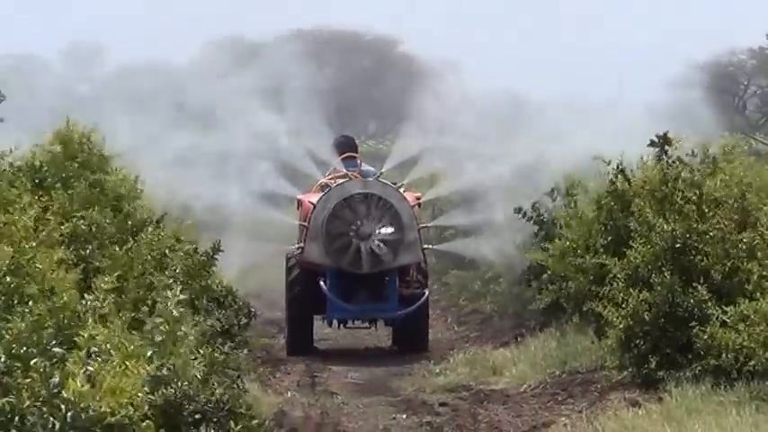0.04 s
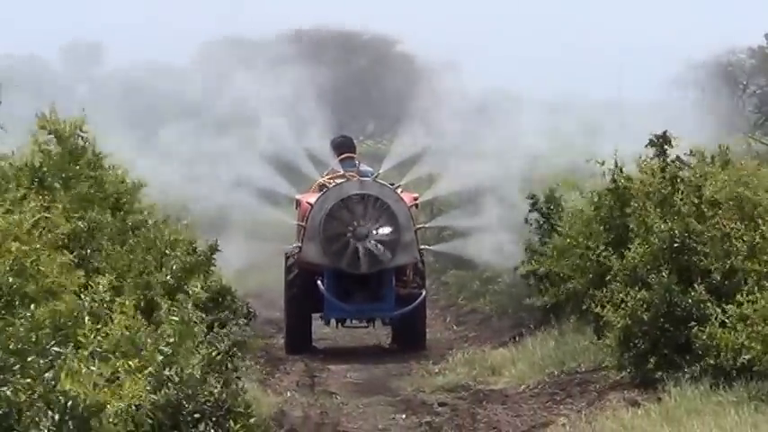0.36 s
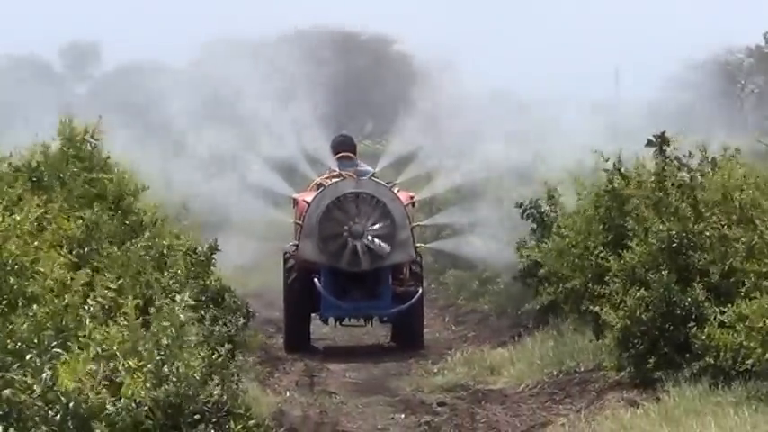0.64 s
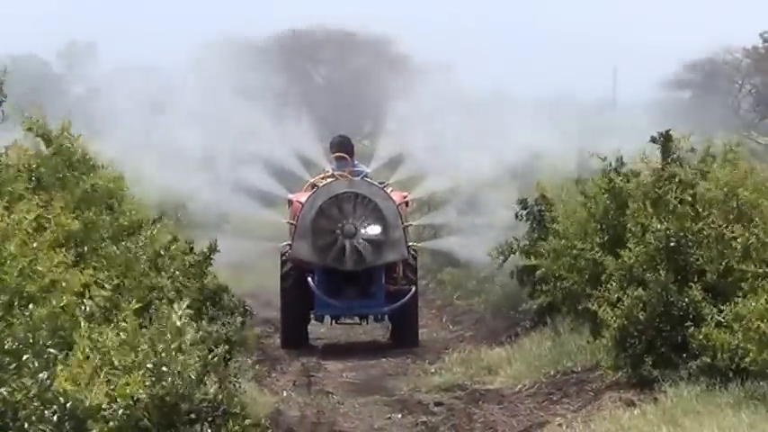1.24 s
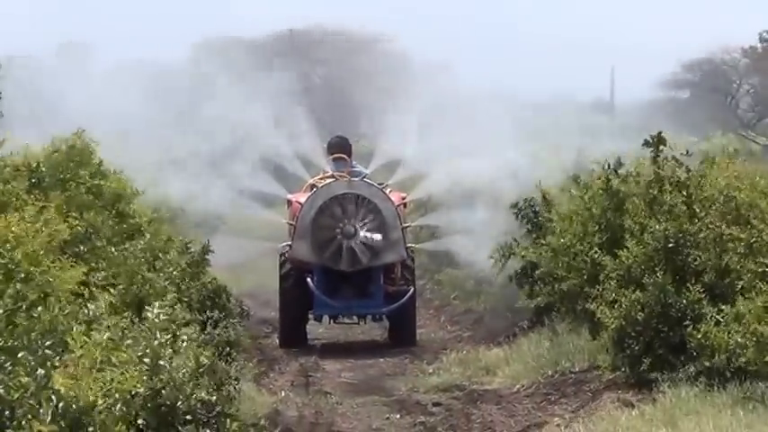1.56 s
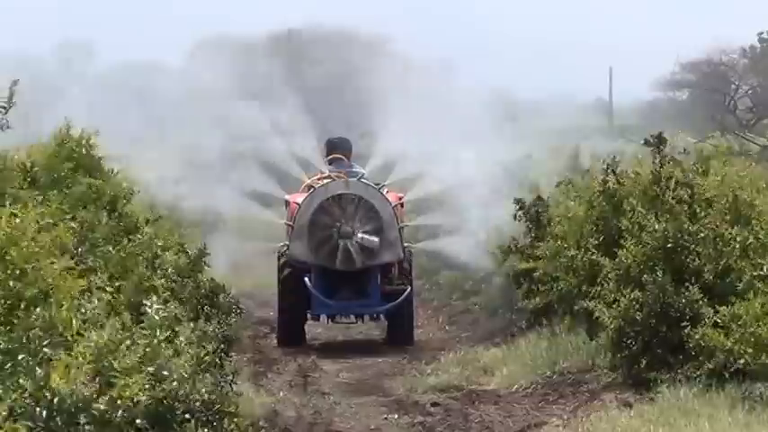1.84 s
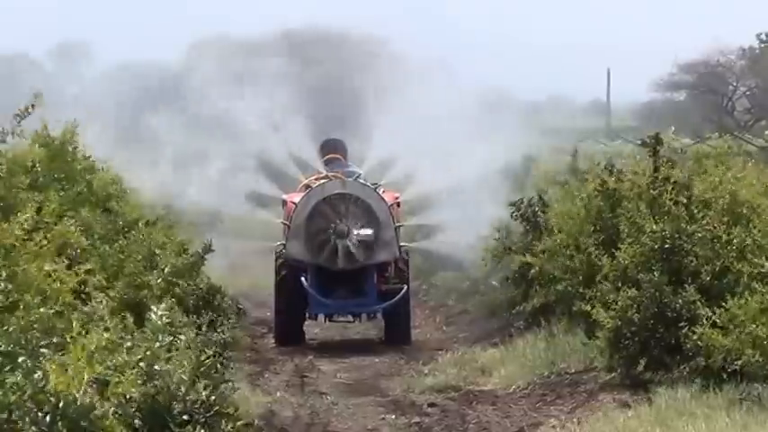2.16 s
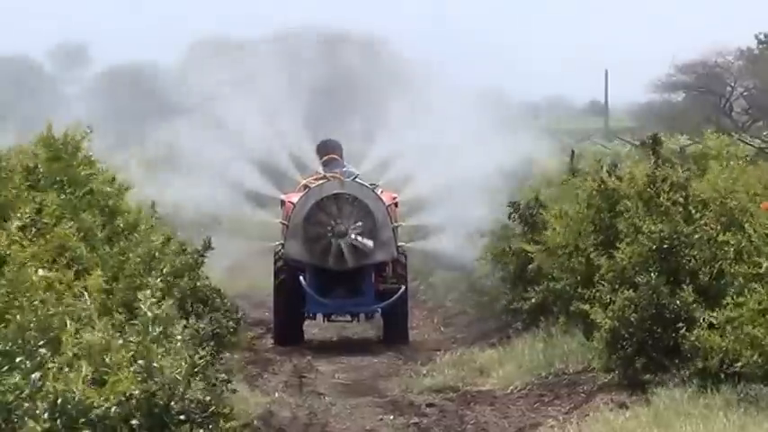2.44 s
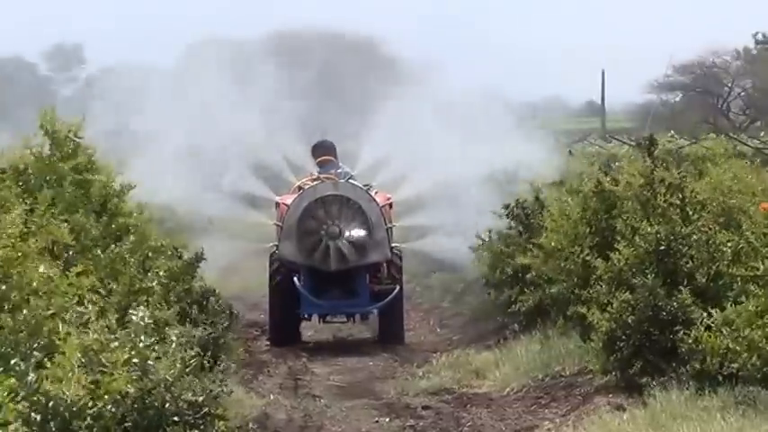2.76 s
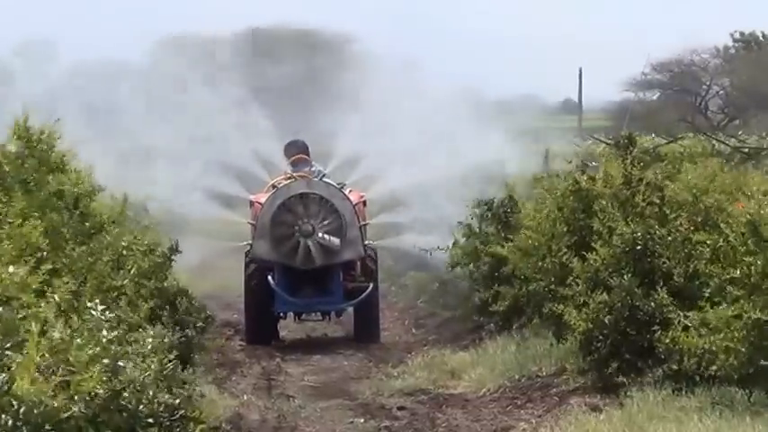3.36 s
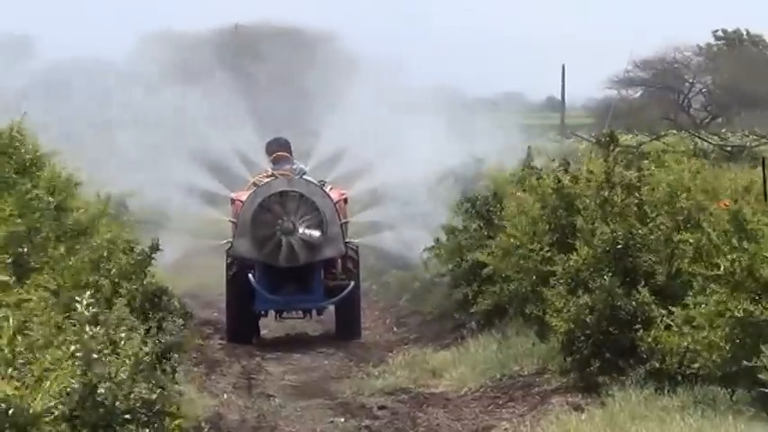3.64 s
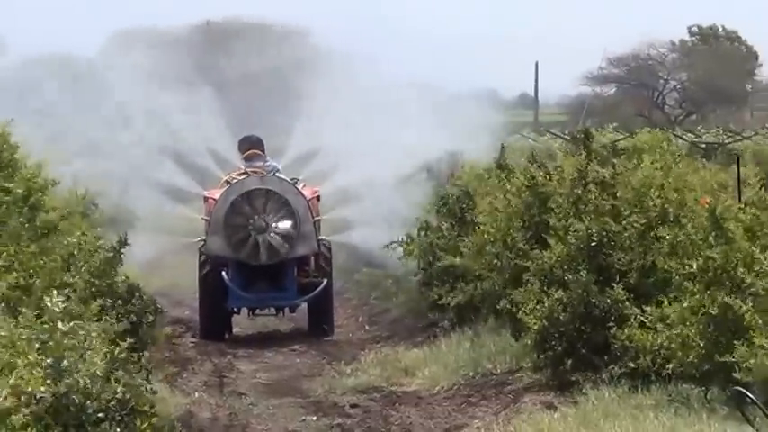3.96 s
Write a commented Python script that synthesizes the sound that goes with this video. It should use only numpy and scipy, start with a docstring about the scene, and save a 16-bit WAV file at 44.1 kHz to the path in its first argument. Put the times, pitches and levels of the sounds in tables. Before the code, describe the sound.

An orchard sprayer's fan roars and its nozzles hiss, with wind buffeting the microphone.

```python
"""Wind buffets the microphone over the roar and hiss of an orchard sprayer behind a tractor.
Turbulent air excites the resonances of the fan housing, giving a swelling roar with a faint whine.
The nozzle jets hiss in surges, and a dull engine drone lies beneath them.
The hardest puffs of wind drive a limiter, which ducks the whole sound."""
import sys
import numpy as np
from scipy import signal
from scipy.io import wavfile
from scipy.ndimage import uniform_filter1d

SR = 44100
rng = np.random.default_rng(int(sys.argv[2]) if len(sys.argv) > 2 else 0)


def wrap_up_sound(samples):
    """Save the sound to the file named by the first command line argument, as 16-bit audio."""
    columns = np.atleast_2d(samples).T
    # keep every value between -1 and 1, then stretch to whole-number steps
    tamed = np.clip(columns, -1, 1)
    steps = np.round(tamed * 32767).astype(np.int16)
    wavfile.write(sys.argv[1], SR, steps)


N = 176400

# spectrum of the engine drone and far rush of air: frequency_hz, relative_density_db
DRONE_SPECTRUM = [(30, -5.5), (90, -8), (200, -15), (400, -22.5), (650, -9), (1000, -14), (2000, -33)]
# faint narrow bands of noise, opposite in left and right, that widen the sound:
# centre_hz, bandwidth_hz, relative_level_db
WIDENING_BANDS = [(1390, 270, -29.5), (2450, 180, -35), (3130, 180, -38), (3720, 180, -39),
                  (4420, 240, -28.5)]

# steady push of the wind: time_s, relative_level_db
BREEZE_ENVELOPE = [(0, -29), (.35, -30), (.65, -30.5), (.92, -34.5), (1.25, -29.5), (1.38, -33),
                   (1.72, -28), (2.0, -30), (2.2, -37), (2.33, -30), (2.55, -37.5), (2.85, -30),
                   (3.15, -31.5), (3.4, -28), (3.53, -38), (3.65, -39), (3.75, -31.5), (4, -32.5)]
# puffs of wind: centre_s, half_power_width_s, relative_rumble_db, relative_flapping_db
WIND_PUFFS = [(0.056, 0.0073, -16.5, -25), (0.149, 0.014, -21, -24), (0.202, 0.0075, -17, -31),
              (0.276, 0.016, -17, -20.5), (0.554, 0.0096, -12, -15.5), (0.587, 0.039, -17.5, -26.5),
              (0.754, .014, -16.5, -25.5), (0.791, 0.013, -22, -26.5), (1.175, 0.011, -23, -20),
              (1.215, 0.011, -20.5, -17), (1.247, 0.016, -13.5, -20.5), (1.285, 0.018, -20, -26),
              (1.516, .022, -20, -26), (1.574, .018, -22, -30), (1.618, 0.016, -5, -14),
              (1.657, 0.023, -8, -9.5), (1.681, 0.016, -9, -19), (1.716, 0.02, -11, -15.5),
              (1.755, 0.03, -17.5, -21), (1.781, 0.035, -16.5, -17), (1.873, 0.0095, -27.5, -15),
              (1.946, 0.004, -13.5, -25), (2.141, 0.0086, -26, -29), (2.252, 0.026, -22, -19.5),
              (2.36, 0.014, -25, -27), (2.675, 0.022, -23.5, -29.5), (2.789, .018, -20, -38),
              (2.848, 0.037, -25, -29.5), (3.054, 0.018, -24, -26.5), (3.188, 0.016, -16.5, -18.5),
              (3.304, 0.02, -12.5, -24), (3.332, 0.057, -20, -20.5), (3.373, 0.01, -19, -32),
              (3.431, 0.019, -19, -19), (3.723, 0.039, -26.5, -43), (3.995, .022, -22, -39)]
# spectrum of the wind's low rumble: frequency_hz, relative_density_db
RUMBLE_SPECTRUM = [(20, -4), (35, -5.5), (70, 2.5), (120, 3), (190, -7), (300, -14), (600, -54.5)]
# spectrum of the wind's rougher flapping: frequency_hz, relative_density_db
FLAPPING_SPECTRUM = [(100, -4.5), (200, 3.5), (320, -1), (480, -7), (750, -15), (1300, -30), (2500, -40)]

# spectrum of the nozzle hiss: frequency_hz, relative_density_db
HISS_SPECTRUM = [(3500, -1), (4600, -2.5), (5400, 1), (7200, 1.5), (8500, -1.5), (11000, -12.5),
                 (16000, -17)]
# swell of the nozzle hiss: time_s, level_db
HISS_ENVELOPE = [(0, -45), (.11, -32.5), (.25, -37.5), (.6, -39.5), (.8, -37.5), (1.1, -36.5),
                 (1.28, -28.5), (1.45, -31.5), (1.6, -28), (1.85, -31), (2.15, -28), (2.28, -27),
                 (2.52, -24.5), (2.95, -28), (3.38, -27.5), (3.5, -26.5), (3.82, -32.5), (4, -30.5)]
# spectrum of the mist's sizzle: frequency_hz, relative_density_db
SIZZLE_SPECTRUM = [(6800, -9.5), (7800, -0.5), (8600, 4), (10000, 3), (11200, 2.5), (12300, -3.5),
                   (13500, -8), (16000, -13)]
# surges of the sizzle: time_s, level_db
SIZZLE_ENVELOPE = [(0, -40), (.12, -28), (.23, -38), (.33, -33), (.52, -41.5), (.71, -36), (.91, -37),
                   (.99, -33), (1.1, -34.5), (1.28, -28.5), (1.46, -31), (1.6, -28.5), (1.99, -29.5),
                   (2.07, -26), (2.28, -28.5), (2.42, -24.5), (2.57, -23), (2.76, -27), (2.88, -27),
                   (2.96, -28), (3.25, -26.5), (3.36, -29), (3.49, -26.5), (3.68, -26.5), (3.8, -30.5),
                   (3.91, -26.5), (4, -29.5)]
# airy top of the treble: time_s, level_db
AIR_ENVELOPE = [(0, -48), (.12, -43), (.53, -49), (.71, -45), (1.05, -50), (1.3, -42), (1.48, -46),
                (1.58, -43), (2.28, -47), (2.48, -35), (2.62, -37), (2.9, -52), (3.6, -47), (3.82, -46),
                (4, -41)]
# stereo width of the hiss and sizzle: frequency_hz, side_to_mid_db
HISS_WIDTH = [(4000, -48), (5500, -28), (7600, -9), (10000, -22.5), (15000, -46.5)]

# lower resonances of the fan housing: centre_hz, bandwidth_hz, relative_level_db
LOWER_MODES = [(1378, 203, -3.5), (1175, 166, -10), (1580, 95, -13.5)]
# swell of the lower roar: time_s, gain_db
LOWER_ENVELOPE = [(0, -45.5), (.35, -45.5), (.7, -35.5), (1.5, -35.5), (2.05, -34), (2.75, -30.5),
                  (3.3, -32), (4, -37)]
# upper resonances of the fan housing: centre_hz, bandwidth_hz, relative_level_db
UPPER_MODES = [(2023, 390, -11.5), (2903, 444, -9.5), (3335, 380, -12), (4053, 330, -13), (4500, 270, -18),
               (3340, 3160, -9.5)]
# swell of the upper roar, the whines and the widening noise: time_s, gain_db
UPPER_ENVELOPE = [(0, -35), (.12, -32.5), (.45, -32), (.68, -35.5), (.82, -32.5), (1.15, -30.5),
                  (1.45, -24.5), (1.6, -24), (2.0, -28.5), (2.25, -26), (2.38, -24.5), (2.7, -21.5),
                  (3.0, -22), (3.55, -23), (3.8, -26.5), (4, -25.5)]
# thin whines of the fan: pitch_hz, bandwidth_hz, relative_level_db
FAN_WHINES = [(2850, 25, -17.5), (4066, 33, -26), (4405, 37, -20)]

ANTIPHASE = np.array([[1], [-1]])   # opposite signs in the left and right channels


def from_db(db):
    """Amplitude grows tenfold for every 20 dB."""
    return 10 ** (np.asarray(db) / 20)


def unit_rms(x):
    """Dividing by the root mean square gives a signal unit power."""
    return x / np.sqrt(np.mean(x ** 2) + 1e-20)


def envelope(rows):
    """Straight lines in decibels give a gain that grows or decays exponentially between rows."""
    return from_db(np.interp(np.arange(N) / SR, *np.transpose(rows)))


def at_hz(curve, hz):
    """Hearing follows frequency ratios, so a curve is interpolated on a logarithmic axis."""
    frequencies, values = np.transpose(curve)
    return np.interp(np.log(hz), np.log(frequencies), values)


def drift(rate_hz):
    """Noise smoothed by two low-pass poles wanders slowly, with unit rms."""
    step, settling = 40, 2000   # audio samples a step; steps for the filter to settle
    pole = np.exp(-2 * np.pi * rate_hz * step / SR)
    noise = rng.standard_normal(N // step + settling + 2)
    slow = signal.lfilter([1], [1, -2 * pole, pole * pole], noise)[settling:]
    return np.interp(np.arange(N) / step, np.arange(len(slow)), unit_rms(slow))


def band_noise(low_hz, high_hz, side_db):
    """An independent side signal decorrelates the channels and widens a band of noise."""
    band_pass = signal.butter(2, [low_hz, high_hz], "band", fs=SR, output="sos")
    mid, side = signal.sosfilt(band_pass, rng.standard_normal((2, N + SR // 10)))[:, -N:]
    return unit_rms(mid + from_db(side_db) * side * ANTIPHASE)


def bands(spectrum, count):
    """Band power is density times bandwidth; each band is low_hz, high_hz, centre_hz, gain."""
    edges = np.geomspace(spectrum[0][0], spectrum[-1][0], count + 1)
    centres = np.sqrt(edges[:-1] * edges[1:])
    gains = from_db(at_hz(spectrum, centres)) * np.sqrt(np.diff(edges))
    return zip(edges[:-1], edges[1:], centres, gains)


def coloured_noise(spectrum, side_db):
    """Independent bands add in power to form the given spectral shape, at unit rms."""
    parts = (gain * band_noise(low, high, side_db) for low, high, _, gain in bands(spectrum, count=12))
    return unit_rms(sum(parts))


def short_term_power(x, window_s):
    """Power is the mean square pressure, here over both channels and a sliding window."""
    return uniform_filter1d(np.mean(x ** 2, axis=0), int(window_s * SR)) + 1e-9


def steadied(noise):
    """Dividing noise by its short-term rms evens out its chance swells."""
    return noise / np.sqrt(short_term_power(noise, window_s=.022))


def resonance(hz, bandwidth_hz, level_db):
    """A resonance driven by noise passes one band of it, here with a fluttering level."""
    flutter_db = .9 * drift(rate_hz=11.6)
    noise = band_noise(hz - bandwidth_hz / 2, hz + bandwidth_hz / 2, side_db=-25)
    return from_db(level_db + flutter_db) * noise


def resonances(rows):
    """Independent bands of noise superpose, each with a flutter of its own."""
    return sum(resonance(*row) for row in rows)


def widening_noise():
    """Faint narrow bands of noise, opposite in left and right, widen the sound."""
    return envelope(UPPER_ENVELOPE) * resonances(WIDENING_BANDS) * ANTIPHASE


def engine():
    """The tractor's drone is steady, dull noise, partly masked by the louder sources."""
    return from_db(-39.5) * coloured_noise(DRONE_SPECTRUM, side_db=-8.5)


def wind():
    """Eddies and puffs press on the microphone; their powers add in a rumble and a rougher flapping."""
    t = np.arange(N) / SR
    eddy_db = 3 * drift(rate_hz=29)
    rumble_power = (envelope(BREEZE_ENVELOPE) * from_db(eddy_db)) ** 2
    flapping_power = rumble_power * from_db(-7) ** 2
    for centre_s, width_s, rumble_db, flapping_db in WIND_PUFFS:
        bell = .5 ** np.minimum((2 * (t - centre_s) / width_s) ** 2, 100)
        rumble_power += from_db(rumble_db) ** 2 * bell
        flapping_power += from_db(flapping_db) ** 2 * bell
    rumble = np.sqrt(rumble_power) * steadied(coloured_noise(RUMBLE_SPECTRUM, side_db=-7.5))
    flapping = np.sqrt(flapping_power) * steadied(coloured_noise(FLAPPING_SPECTRUM, side_db=4))
    return from_db(-.5) * rumble + from_db(-2) * flapping


def jet(spectrum):
    """A turbulent jet radiates broadband noise, here shimmering band by band, at unit rms."""
    lean_hz, lean_width_hz = 7360, 1030   # this part of the treble is louder on the left
    hiss = 0
    for low, high, hz, gain in bands(spectrum, count=14):
        lean_db = 4 * np.exp(-((hz - lean_hz) / lean_width_hz) ** 2)
        shimmer_db = drift(rate_hz=15)
        noise = band_noise(low, high, side_db=at_hz(HISS_WIDTH, hz))
        hiss += gain * from_db(ANTIPHASE * lean_db / 2 + shimmer_db) * noise
    return unit_rms(hiss)


def nozzles():
    """Jet noise forms a swelling hiss and a faintly whistling sizzle that surges as the mist sways."""
    mist = jet(SIZZLE_SPECTRUM)
    whistle = resonance(hz=8400, bandwidth_hz=110, level_db=-16.5)
    sizzle = envelope(SIZZLE_ENVELOPE) * (mist + whistle)
    air = envelope(AIR_ENVELOPE) * band_noise(low_hz=10800, high_hz=14800, side_db=-38)
    hiss = envelope(HISS_ENVELOPE) * jet(HISS_SPECTRUM)
    surge_db = .47 * drift(rate_hz=9.6)
    return from_db(surge_db) * (hiss + sizzle + air)


def fan():
    """Turbulence excites the housing: broad resonances roar, while narrow bands howl and whine."""
    howl = resonance(hz=828, bandwidth_hz=108, level_db=-44.5)
    whines = resonances(FAN_WHINES) + resonance(hz=2961, bandwidth_hz=16, level_db=-17.5)
    upper_roar = envelope(UPPER_ENVELOPE) * (resonances(UPPER_MODES) + whines)
    lower_roar = envelope(LOWER_ENVELOPE) * resonances(LOWER_MODES)
    return howl + lower_roar + upper_roar


def scene():
    """The sprayer straight ahead, the widening noise and the wind add by superposition."""
    return fan() + widening_noise() + nozzles() + engine() + wind()


def record(dry):
    """A soft limiter cuts the gain fast above a threshold and recovers slowly; a low-pass follows."""
    threshold_db, duck_db_per_db, release_db_per_s = -14, .65, 23.5
    window_s, cutoff_hz = .008, 15800
    level_db = 10 * np.log10(short_term_power(dry, window_s))
    demand_db = duck_db_per_db * np.maximum(level_db - threshold_db, 0)
    recovery_db = release_db_per_s * np.arange(N) / SR
    # each peak of gain reduction decays at the release rate
    duck_db = np.maximum.accumulate(demand_db + recovery_db) - recovery_db
    gain = from_db(-uniform_filter1d(duck_db, int(window_s * SR)))
    low_pass = signal.ellip(12, .1, 80, cutoff_hz, fs=SR, output="sos")
    return signal.sosfilt(low_pass, dry * gain)


dry = scene()
out = record(dry)
wrap_up_sound(out)
```